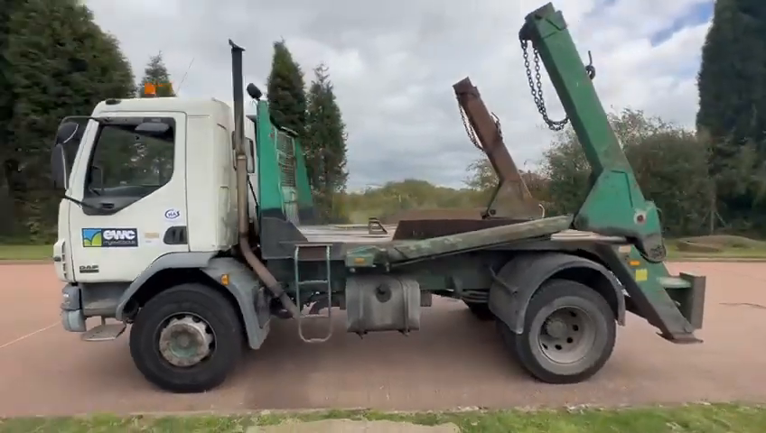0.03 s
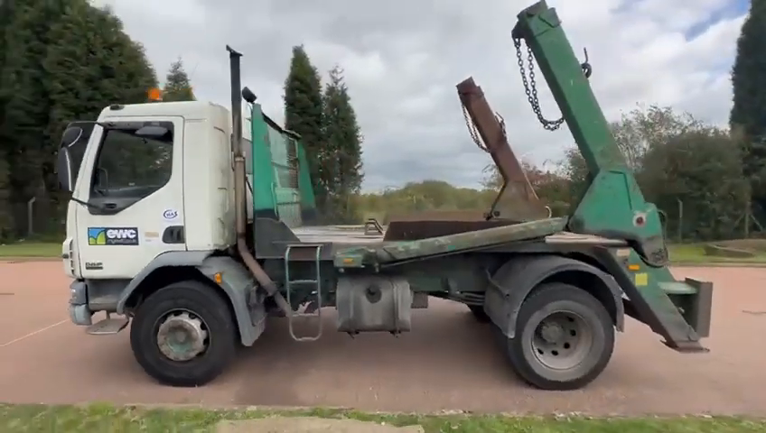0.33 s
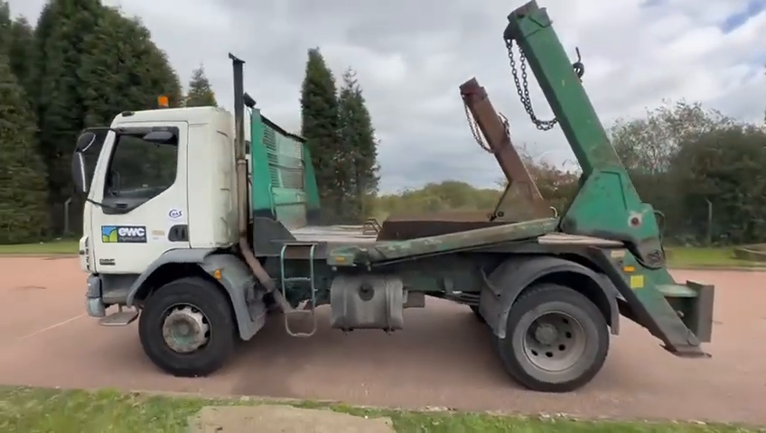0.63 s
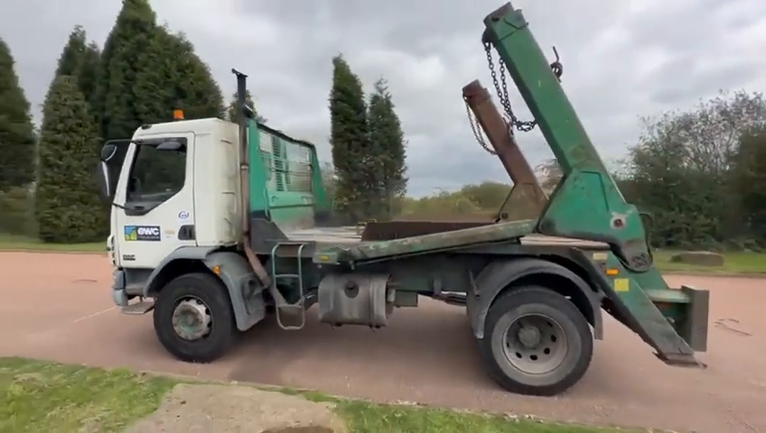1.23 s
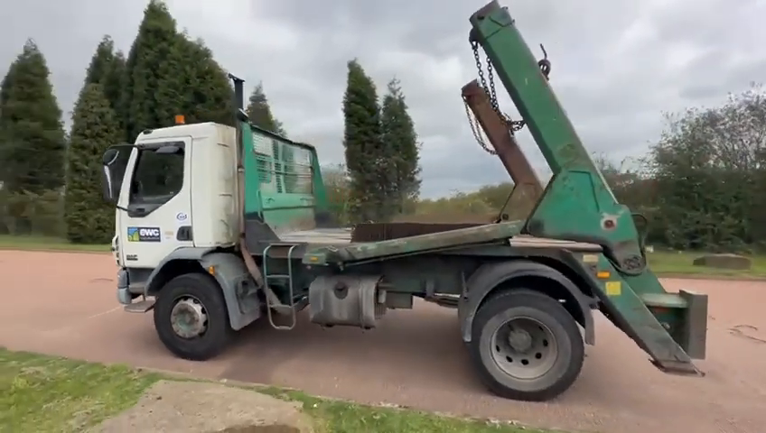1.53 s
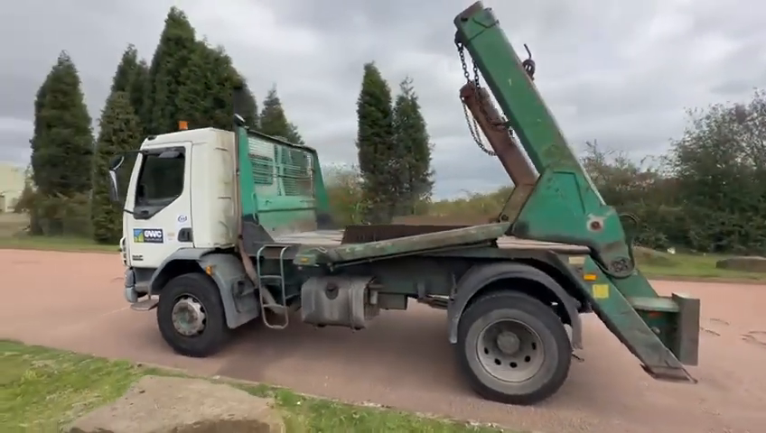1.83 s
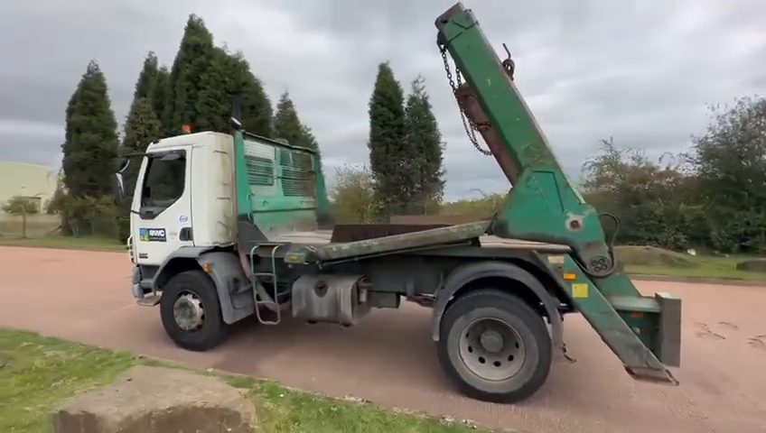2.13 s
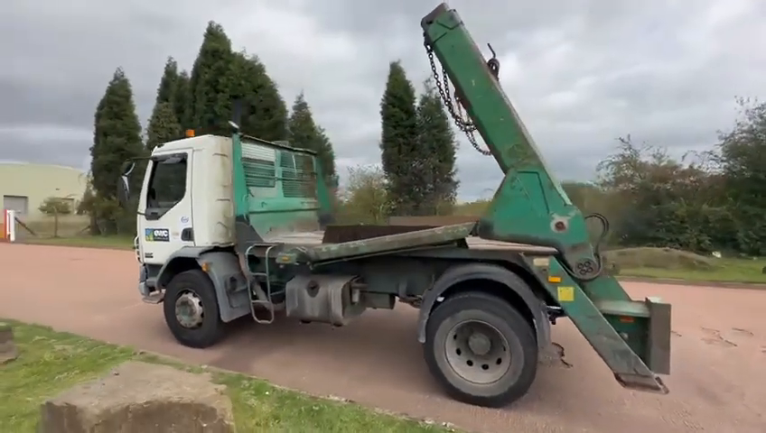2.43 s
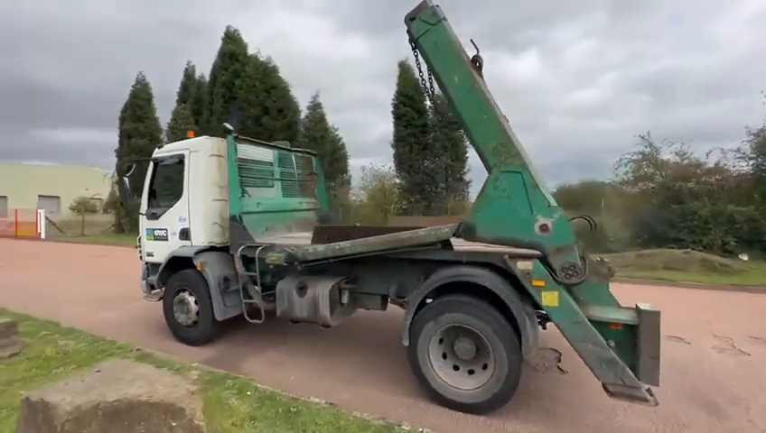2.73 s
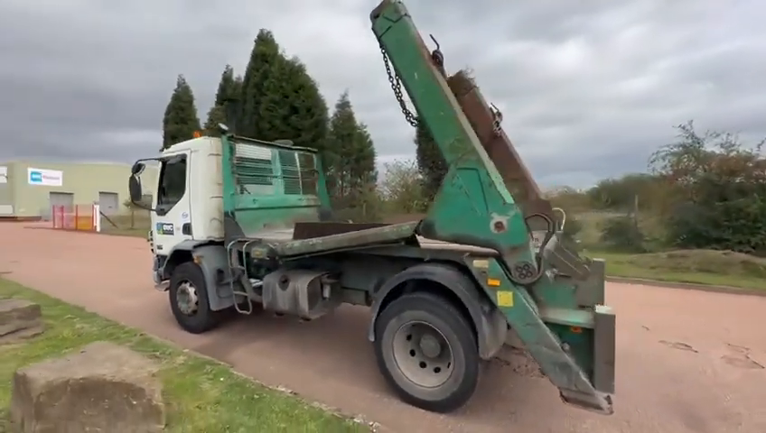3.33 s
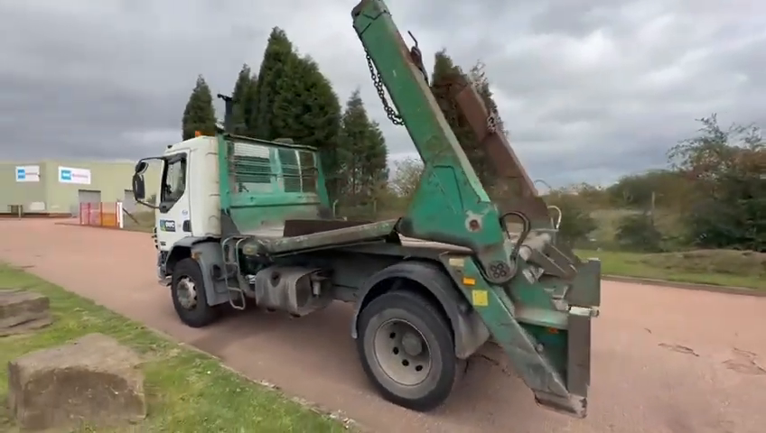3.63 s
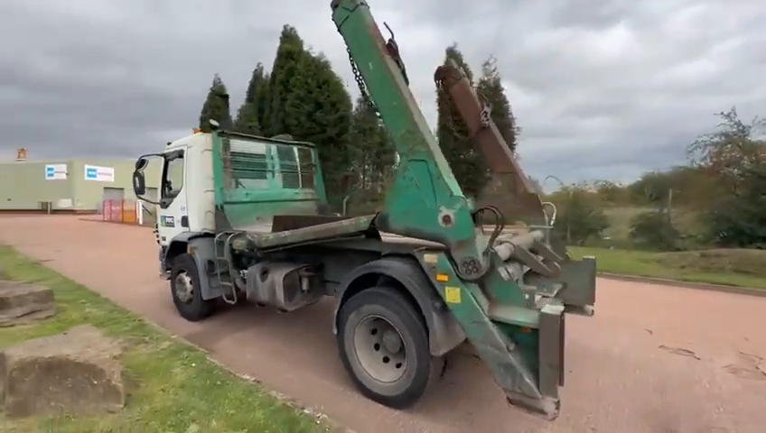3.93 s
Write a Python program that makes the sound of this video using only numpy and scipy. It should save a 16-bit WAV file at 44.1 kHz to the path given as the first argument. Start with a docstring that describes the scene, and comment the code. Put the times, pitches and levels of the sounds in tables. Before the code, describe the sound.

A diesel truck idles a few metres away outdoors, with a steady low thud, metallic clatter and a faint pulsing hiss. Wind rumbles and slaps on the microphone, strong at first, then thinning to single buffets.

```python
"""Wind slaps, rumbles and flutters on the microphone over the thud and clatter of a diesel truck.
The six-cylinder engine idles a few metres to the left of a slowly walking listener: each firing
excites the exhaust and the block, the injectors sizzle, the timing gears whine at their mesh rates
and the air compressor hisses once a stroke. The turbulence, strong at first, thins to single buffets."""
import sys
import numpy as np
from scipy import signal
from scipy.fft import rfft, irfft
from scipy.io import wavfile
from scipy.ndimage import uniform_filter1d

SR = 44100
rng = np.random.default_rng(int(sys.argv[2]) if len(sys.argv) > 2 else 0)


def transcribe(signal):
    """Save signal, clipped to [-1, 1], as a 16-bit WAV file at the path in sys.argv[1]."""
    frames = np.atleast_2d(signal).T
    limited = np.clip(frames, -1, 1)
    pcm = np.round(limited * 32767).astype(np.int16)
    wavfile.write(sys.argv[1], SR, pcm)


N = 176400
FIRING_HZ = 34.96

# Spectra of the exhaust, the block and the injectors (frequency [Hz], relative level [dB])
THUD_SPECTRUM = [(25, -29), (52, 2), (70, 15), (105, 5), (170, 10), (300, -8.5), (600, -43)]
CLATTER_SPECTRUM = [(40, 4), (100, 10), (220, 2), (420, 0), (700, -3.5), (1250, -6), (1460, -13.5),
                    (1850, -1.5), (2400, -7), (2900, -11.5), (3600, -20.5), (6000, -38)]
SIZZLE_SPECTRUM = [(1500, -38), (2800, -4.5), (3700, -10.5), (4450, 4), (4800, 1), (5450, 4.5), (6100, 0),
                   (7000, -3.5), (8000, -8), (9000, -16), (10000, -27.5)]
def engine(t, thud_decay_s=0.0045, clatter_floor=0.86):
    """Impulse excitation: each firing thuds in the exhaust and rattles the block; injectors sizzle."""
    cycle = t * FIRING_HZ
    phase = cycle % 1
    strength = undb(4 * rng.standard_normal(size=200))[cycle.astype(int)]
    pulse = strength * np.exp(-phase / FIRING_HZ / thud_decay_s)
    thud = undb(-44) * colour(np.diff(pulse, prepend=0), THUD_SPECTRUM)
    knock = strength * np.exp(-phase)
    clatter = undb(-33) * colour(stereo_noise(-0.36) * (clatter_floor + knock), CLATTER_SPECTRUM)
    injection = stereo_noise(0.096) * (1 + 0.77 * knock)
    sizzle = undb(-41) * colour(metal_ring(injection), SIZZLE_SPECTRUM)
    return thud + clatter + sizzle


def metal_ring(x, decay_s=.004, ring_db=-7):
    """Damped resonance: the dense modes of engine metal add a short tail; rms 1."""
    age = np.arange(1024) / SR
    tail = rng.standard_normal((2, len(age))) * np.exp(-age / decay_s)
    tail /= np.sqrt(np.sum(tail ** 2, axis=1, keepdims=True))
    return unit(x + undb(ring_db) * signal.fftconvolve(x, tail, axes=1)[:, :N])


# Tooth-mesh tones (frequency [multiples of the crank rate], waver [fraction])
MESH_TONES = [(108, .008), (144, .006), (180, .002), (198, .005)]
# Their strength along the walk (time [s], relative level of each tone from the lowest up [dB])
MESH_LEVELS = [(0, -53, -47, -50, -55), (1.2, -48, -56, -42, -53), (1.8, -50, -48, -40.5, -52),
               (2.2, -52, -42, -48, -51), (2.8, -53, -44.5, -44.5, -52), (3.35, -63, -43, -47.5, -53),
               (4, -65, -48.5, -45, -53)]
def timing_gears(t, flicker_db=3.5, sideband_db=-8):
    """Gear meshing: tones follow the crank; the jolt of the firings adds an upper sideband to each."""
    times, *levels = np.array(MESH_LEVELS).T
    crank_hz = FIRING_HZ / 3  # three firings a turn
    left_lead_rad = np.array([[1.4], [0]])
    out = np.zeros((2, N))
    for (multiple, waver), db in zip(MESH_TONES, levels):
        cycles = np.cumsum(multiple * crank_hz * (1 + waver * drift(hz=26.3))) / SR
        level = undb(np.interp(t, times, db))
        for shift_hz, gain in ((0, 1), (FIRING_HZ, undb(sideband_db))):
            tone = np.sin(2 * np.pi * (cycles + shift_hz * t) + left_lead_rad)
            out += gain * level * unit(tone * undb(flicker_db * drift(hz=36)))
    return out


# Spectrum of the compressor's air (frequency [Hz], relative level [dB])
AIR_SPECTRUM = [(1500, -8.5), (2600, -2), (3600, -6), (4500, -2), (5500, 1), (6200, 1.5), (7200, -4.5),
                (8100, 0), (8600, -11.5), (10000, -22)]
def compressor(t, stroke_hz=11.97, first_peak_s=0.054, jitter_s=.004, valve_decay_s=.003):
    """Flow noise and impact: every piston stroke brings a swell of hissing air and a valve tick."""
    strokes = (t - first_peak_s) * stroke_hz + .5
    size, late, valve = rng.standard_normal(size=(64, 3))[np.floor(strokes).astype(int)].T
    off_peak_s = (strokes % 1 - .5) / stroke_hz - jitter_s * late
    swell = np.exp(-.5 * (off_peak_s * stroke_hz / 0.19) ** 2) * undb(.9 * size + drift(hz=90))
    tick = (off_peak_s > 0) * np.exp(-np.abs(off_peak_s) / valve_decay_s) * undb(-7 + 5 * valve)
    return undb(-41.5) * colour(stereo_noise(0) * (swell + tick), AIR_SPECTRUM)


# Level of the truck on the walk towards its rear (time [s], gain [dB])
WALK_GAIN = [(0, 1), (.9, 1.1), (1.8, -0.8), (2.6, 0.5), (4, -0.95)]
# Response of the right port against the left (frequency [Hz], gain [dB])
FAR_PORT = [(100, -2), (550, -3.5), (1250, 2), (1500, -8), (1700, -5), (2080, -14), (2500, -6.5),
            (3600, -3), (4600, -5), (5300, -8), (5850, -16), (6600, -15.5), (8000, -8), (8700, -3.5),
            (9300, 0.5)]
def propagation(truck, t):
    """Distance and acoustic shadow: the level follows the walk; the right port faces away."""
    left, right = truck * undb(np.interp(t, *np.array(WALK_GAIN).T))
    return np.array([left, equalise(right, FAR_PORT)])


# Course of the breeze (time [s], relative rumble level [dB], relative flutter level [dB])
BREEZE = [(0, -19, -27), (0.2, -18.5, -24.5), (0.32, -19.5, -34), (0.45, -16.5, -22.5), (0.7, -19.5, -24),
          (0.85, -19.5, -24.5), (1.0, -16.5, -25), (1.15, -14.5, -24), (1.25, -19.5, -27),
          (1.42, -16.5, -30.5), (1.58, -23.5, -34), (1.82, -32.5, -42.5), (2.05, -30, -47.5),
          (2.22, -29, -41.5), (2.45, -22.5, -32.5), (2.68, -24.5, -39), (2.82, -33, -42),
          (3.0, -26.5, -43.5), (3.25, -25.5, -34), (3.4, -23.5, -40.5), (3.55, -40.5, -43),
          (3.9, -49.5, -44.5), (4, -37, -26)]
# Gusts on top (peak time [s], half-width [s], relative rumble level [dB], relative flutter level [dB])
GUST_PEAKS = [(0.421, 0.011, -21, -22.5), (0.587, 0.049, -26, -26), (0.802, 0.026, -18, -23),
              (0.876, 0.012, -30, -25.5), (0.935, 0.07, -21.5, -28.5), (1.062, 0.052, -18, -25),
              (1.115, 0.021, -18.5, -27), (1.322, 0.042, -19, -32), (1.437, 0.044, -30, -24.5),
              (1.767, 0.031, -25, -37), (1.93, 0.066, -28.5, -43), (2.17, 0.014, -31, -41),
              (2.31, 0.03, -33, -38), (2.4, 0.045, -24.5, -32), (2.626, 0.035, -20.5, -36),
              (2.875, 0.028, -22.5, -30.5), (2.965, 0.068, -29.5, -55), (3.192, 0.016, -25, -26),
              (3.326, 0.04, -24, -31.5), (3.775, 0.022, -30.5, -39.5), (3.986, 0.016, -38, -26)]
# Spectra of the big and the small eddies (frequency [Hz], relative level [dB])
RUMBLE_SPECTRUM = [(20, -28), (38, -12), (62, 1), (100, -3.5), (180, -5), (300, -7.5), (500, -15.5),
                   (900, -23.5), (2000, -64)]
FLUTTER_SPECTRUM = [(100, -9.5), (300, -1.5), (550, -1), (900, 0), (1300, -3.5), (1700, -9.5), (2200, -21),
                    (3000, -26.5), (7000, -60)]
def wind(t, gust_gain_db=2.5):
    """Turbulent pressure at the ports: big eddies rumble, small ones flutter; gusts swell both."""
    times, *levels = np.array(BREEZE).T
    power = np.array([undb(np.interp(t, times, db)) ** 2 for db in levels])
    for peak_s, width_s, *gust_db in GUST_PEAKS:
        height = undb(gust_gain_db) * undb(gust_db)[:, None]
        power += height ** 2 * np.exp(-2 * ((t - peak_s) / width_s) ** 2)
    eddies = drift(hz=135)
    lumps = undb(1.16 * drift(hz=43) + 1.5 * eddies)
    rumble = steady(colour(stereo_noise(-0.28) * lumps, RUMBLE_SPECTRUM), span_s=0.091)
    flutter = steady(colour(stereo_noise(-0.11) * undb(3.6 * eddies), FLUTTER_SPECTRUM), span_s=0.2)
    rumble *= np.sqrt(power[0]) * undb(-0.5) * pan(left_db=1.74)
    flutter *= np.sqrt(power[1]) * undb(-1.5) * pan(left_db=5)
    return rumble + flutter


# Single eddies (time [s], relative level [dB], frequency [Hz], length [cycles], left minus right [dB])
EDDY_STRIKES = [(.024, -9.5, 830, 1.2, 15), (.075, -11, 78, 1.3, -6), (.121, -10.5, 1060, 2, 0),
                (.192, -10.5, 850, 2.3, 15), (.247, -13.5, 980, 3.9, 0), (.262, -13.5, 1050, 3.4, 10),
                (.264, -12, 290, 1.4, 8), (.38, -12.5, 860, 2.6, 17), (.417, -5, 1350, 1.3, 18),
                (.423, -11.5, 400, 2.4, 6), (.457, -6, 1000, 2.1, 9), (0.469, -13.5, 100, 0.86, 4.5),
                (0.485, -5.5, 860, 2, 9), (.533, -8.5, 800, 0.9, 7), (0.568, -11.5, 120, 1.1, 6.5),
                (0.577, -10.5, 1000, 2.3, -1), (0.627, -11.5, 1100, 2.1, 2), (.643, -12.5, 720, 0.89, 18),
                (.667, -11, 1150, 1.9, 2), (.68, -5.5, 970, 1.3, 17), (.698, -11.5, 1150, 1.6, 13),
                (.738, -11.5, 840, 1.2, 16), (.786, -5.5, 1260, 3, 7), (.805, -4.5, 1300, 2.6, 1.5),
                (.852, -13.5, 940, 1.8, 15), (.887, -7, 1100, 1.2, 6), (0.889, -8, 135, 1.4, 7.5),
                (.938, -9, 970, 1.5, 0), (.962, -9, 72, 1.1, 1), (.984, -11, 940, 1.1, 7),
                (1.002, -9.5, 1050, 2, 1), (1.042, -9.5, 260, 1, 9.5), (1.066, -10, 94, 1.5, -4),
                (1.168, -9, 108, 1.1, -6), (1.199, -10, 820, 1.5, 14), (1.314, -5, 295, 2.3, 0),
                (1.43, -11, 520, 2, -3), (1.455, -12, 735, 4, 12), (1.652, -13.5, 106, 0.89, 1),
                (1.762, -17.5, 335, 1.7, 3), (1.941, -20, 76, 1.2, -2), (1.98, -16, 99, 1.5, 5),
                (2.181, -17, 420, 2.2, 4), (2.369, -12, 92, 1.8, 3), (2.378, -17, 283, 3, -3),
                (2.43, -14.5, 370, 1.5, -7.5), (2.478, -14.5, 72, .9, 2), (2.579, -9, 129, 1.3, 2),
                (2.584, -14, 1000, 1.6, 1), (2.63, -9.5, 356, 1.44, -1), (2.863, -8, 530, 1.5, 14),
                (2.881, -7.5, 830, 1.2, 13), (3.075, -12, 245, 1.65, 4), (3.117, -23, 850, 2.2, 8),
                (3.186, -14.5, 700, 1.5, -7), (3.193, -11.5, 800, 1.7, 16), (3.221, -17, 690, 2.9, 10),
                (3.325, -13, 91, 1.2, -2.5), (3.327, -10, 430, 2.7, 9), (3.342, -11.5, 580, 2.2, 12),
                (3.351, -15.5, 790, 2.6, 12), (3.782, -18, 450, 2.2, 9), (3.994, -5.5, 850, 1.5, 19),
                (3.996, -14, 450, 2.4, 6)]
# Response of the ports, which dulls the slaps (frequency [Hz], gain [dB])
PORT_RESPONSE = [(30, -5), (60, -0.5), (1500, 0.5), (2100, 0), (3000, -9), (7000, -23)]
def buffets(t, rise_cycles=0.12, left_lead_rad=1.66):
    """Pressure transients: a hard front, then ragged swings; small eddies crack, big ones thump."""
    out = np.zeros((2, N))
    ragged_time = np.cumsum(np.exp(.2 * drift(hz=400))) / SR
    lead = np.array([[left_lead_rad], [0]])
    for peak_s, db, hz, length, left_db in EDDY_STRIKES:
        near = np.abs(t - peak_s) * hz < 20
        cycles = (t[near] - peak_s) * hz + .5
        envelope = np.exp(-np.logaddexp(-cycles / rise_cycles, cycles / (0.74 * length)))
        swings = np.sin(2 * np.pi * hz * ragged_time[near] + rng.uniform(0, 2 * np.pi) + lead)
        out[:, near] += undb(db) * envelope / envelope.max() * swings * unit(pan(left_db))
    return equalise(out, PORT_RESPONSE)


def undb(db):
    return 10 ** (np.asarray(db) / 20)


def unit(x):
    return x / np.sqrt(np.mean(x ** 2))


def pan(left_db):
    """Level difference: left and right gains, left_db apart."""
    return undb(np.array([[left_db], [-left_db]]) / 2)


def equalise(x, curve):
    """Zero-phase filtering by a curve of (frequency [Hz], gain [dB])."""
    hz, db = np.array(curve).T
    f = np.maximum(np.arange(N // 2 + 1) * SR / N, 1)
    return irfft(rfft(x) * undb(np.interp(np.log(f), np.log(hz), db)), N)


def colour(x, spectrum):
    """Spectral shaping; rms 1."""
    return unit(equalise(x, spectrum))


def stereo_noise(correlation):
    """Partial coherence: left and right noise with a given correlation; rms 1."""
    mid, side = rng.standard_normal((2, N))
    return unit(np.sqrt(1 + correlation) * mid + np.sqrt(1 - correlation) * np.array([side, -side]))


def drift(hz):
    """Random modulation: smooth noise up to about hz; rms 1."""
    f = np.arange(N // 2 + 1) * SR / N
    return unit(irfft(rfft(rng.standard_normal(N)) * np.exp(-(f / hz) ** 2), N))


def steady(x, span_s):
    """Envelope normalisation: a noise loses its slow swells and keeps its fine grain."""
    power, size = np.mean(x ** 2, axis=0), int(span_s * SR)
    return x / np.sqrt(uniform_filter1d(uniform_filter1d(power, size), size))


def scene():
    """Superposition: the truck's sound and the wind's pressure add at the microphone."""
    t = np.arange(N) / SR
    truck = engine(t) + compressor(t) + timing_gears(t)
    return propagation(truck, t) + wind(t) + buffets(t)


def record(dry, cutoff_hz=10100):
    """Clipping and band limiting: peaks are capped at full scale and the top treble is cut."""
    lowpass = signal.ellip(8, .2, 70, cutoff_hz, fs=SR, output="sos")
    return signal.sosfilt(lowpass, np.clip(dry, -1, 1))


dry = scene()
out = record(dry)
transcribe(out)
```